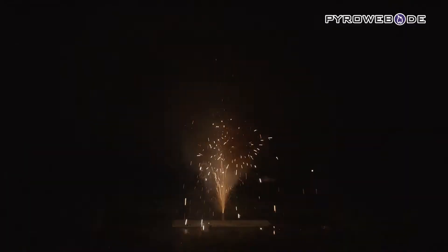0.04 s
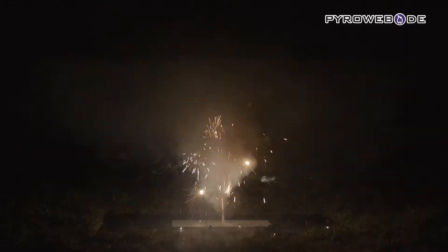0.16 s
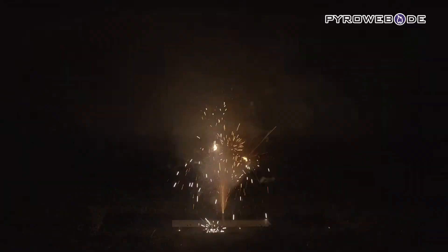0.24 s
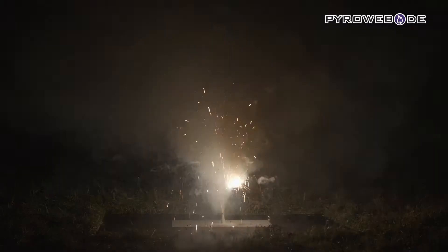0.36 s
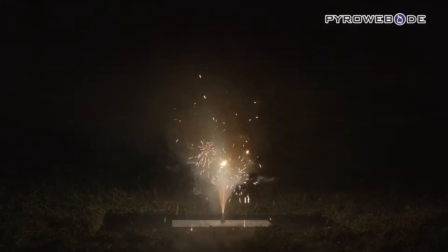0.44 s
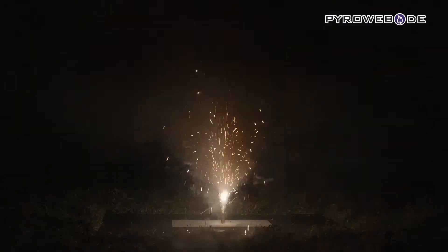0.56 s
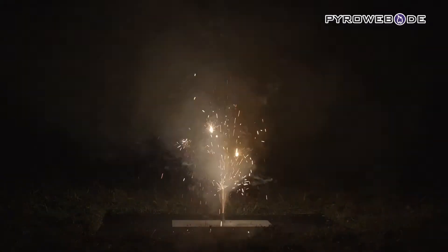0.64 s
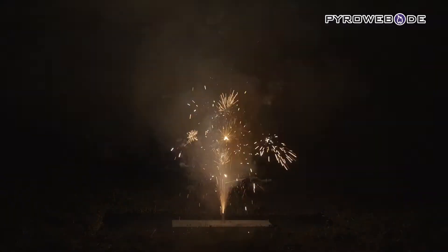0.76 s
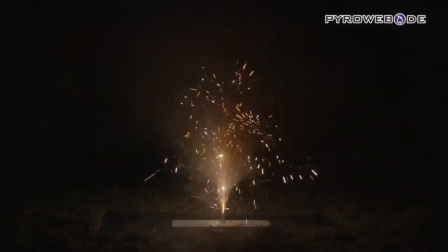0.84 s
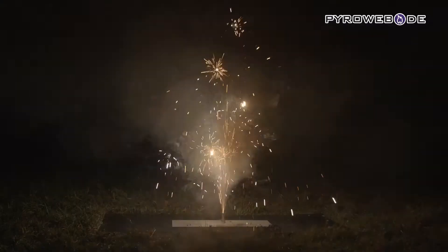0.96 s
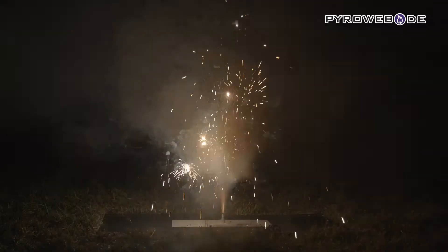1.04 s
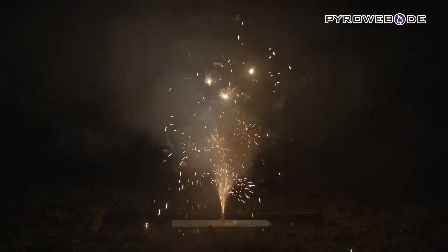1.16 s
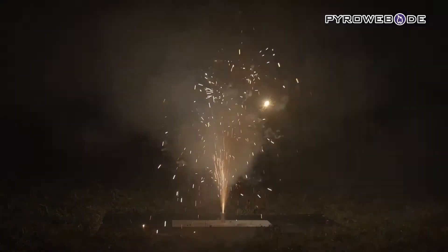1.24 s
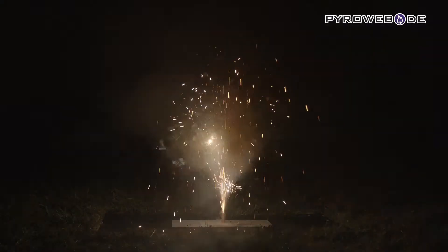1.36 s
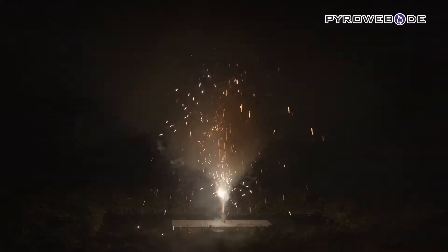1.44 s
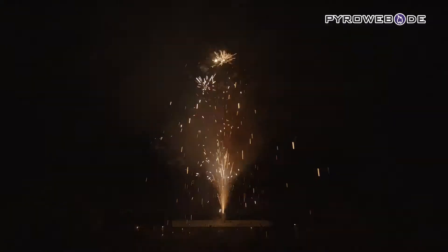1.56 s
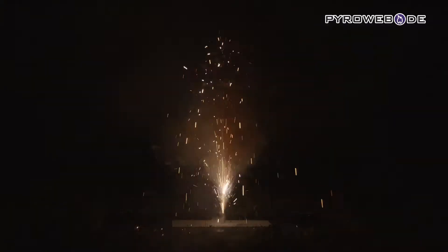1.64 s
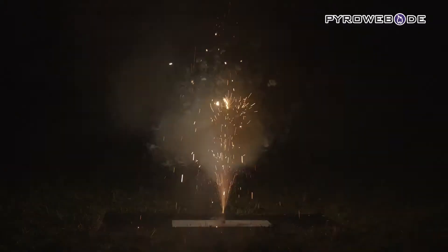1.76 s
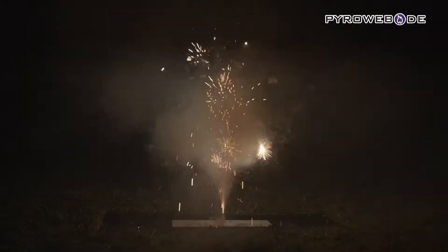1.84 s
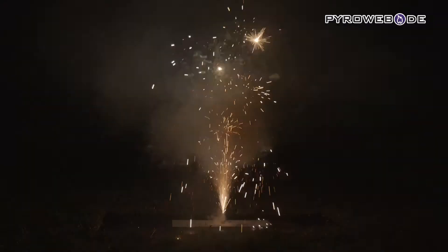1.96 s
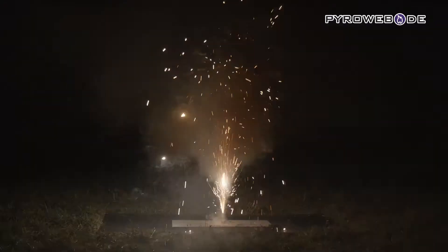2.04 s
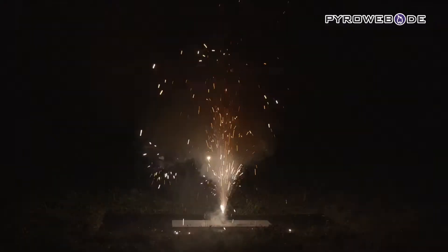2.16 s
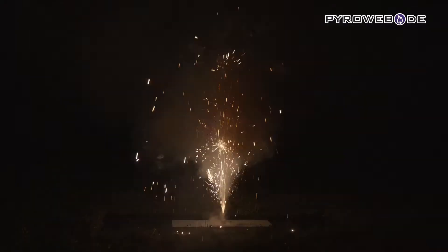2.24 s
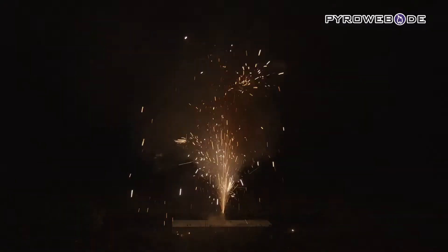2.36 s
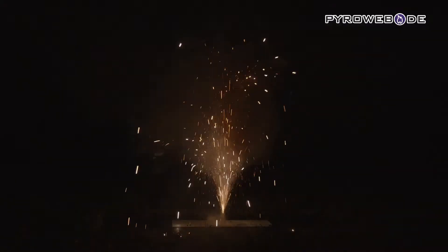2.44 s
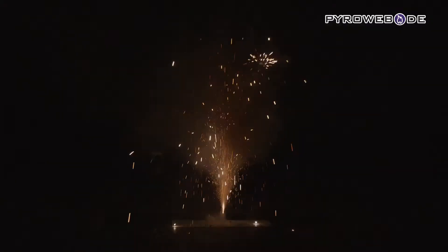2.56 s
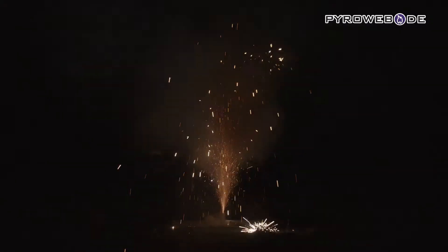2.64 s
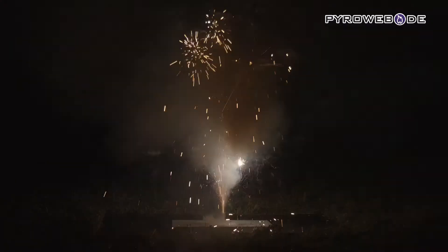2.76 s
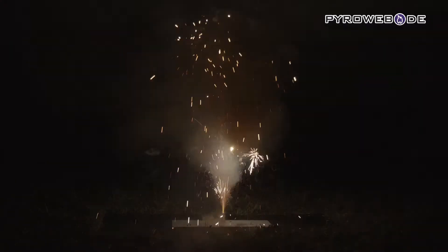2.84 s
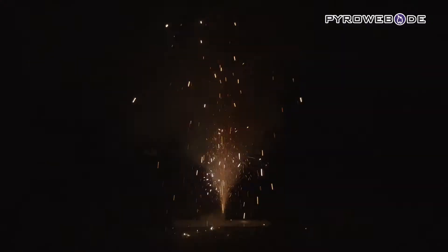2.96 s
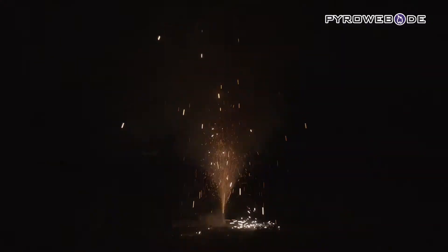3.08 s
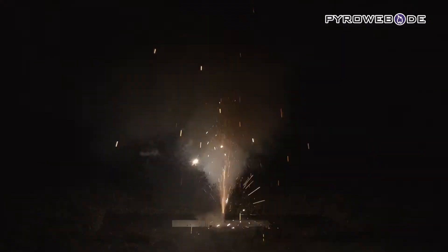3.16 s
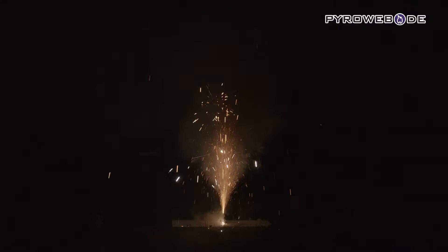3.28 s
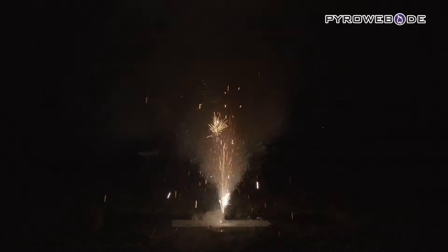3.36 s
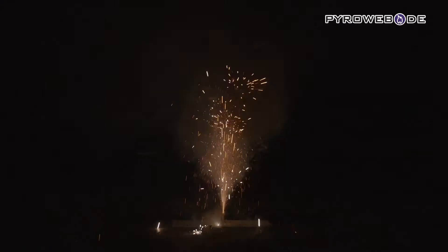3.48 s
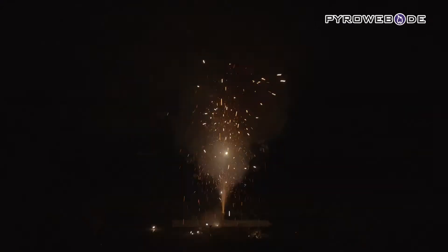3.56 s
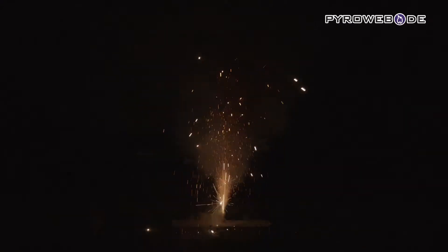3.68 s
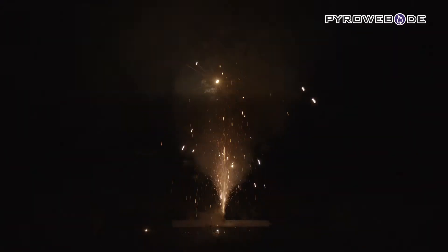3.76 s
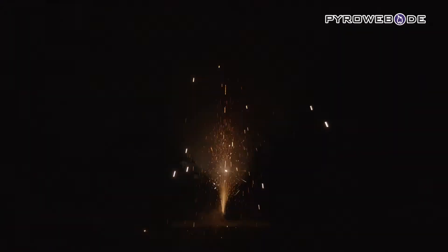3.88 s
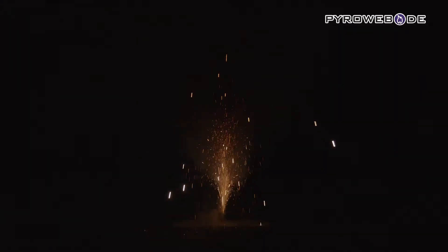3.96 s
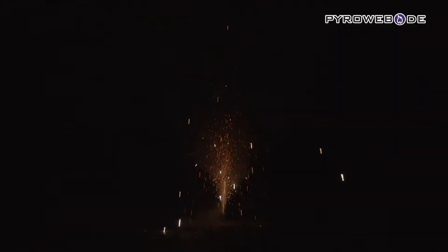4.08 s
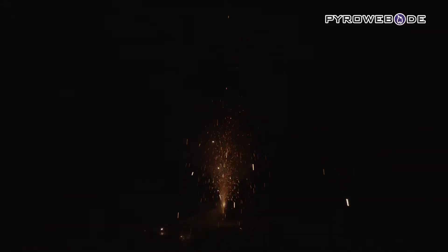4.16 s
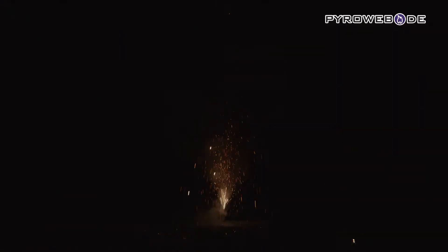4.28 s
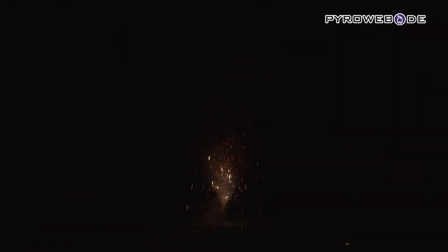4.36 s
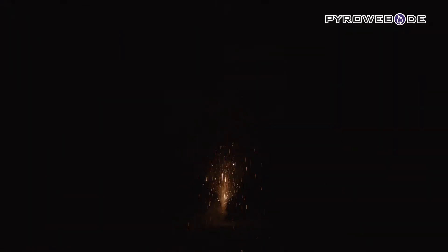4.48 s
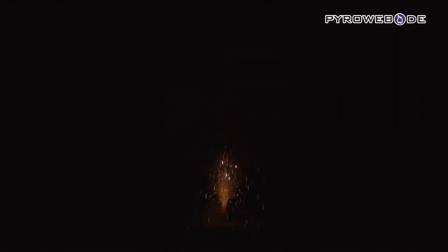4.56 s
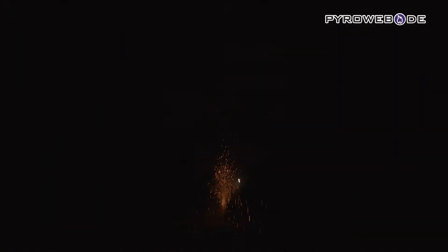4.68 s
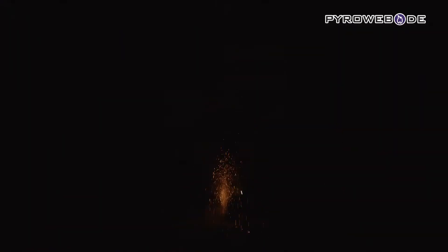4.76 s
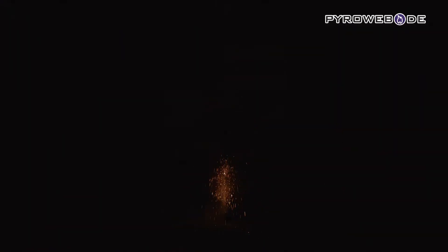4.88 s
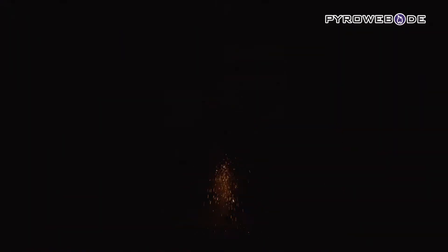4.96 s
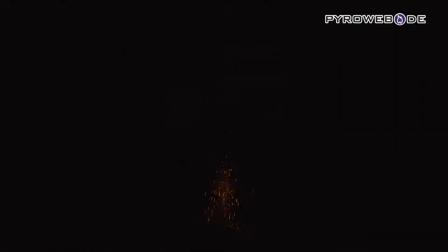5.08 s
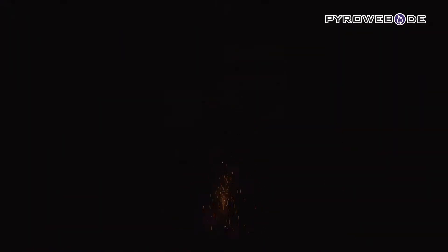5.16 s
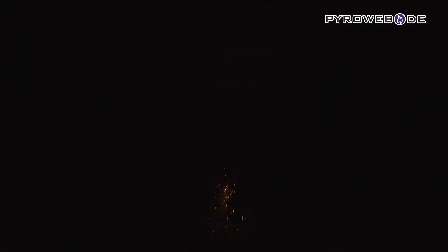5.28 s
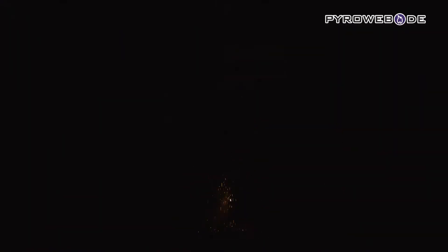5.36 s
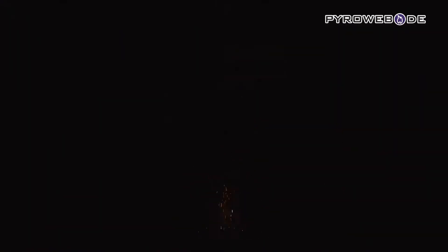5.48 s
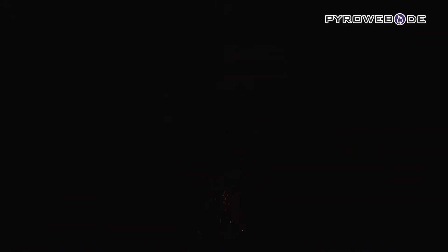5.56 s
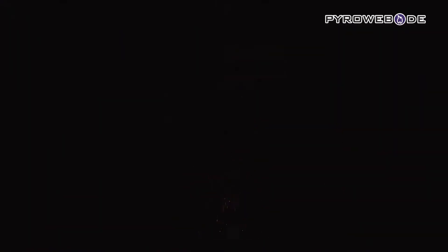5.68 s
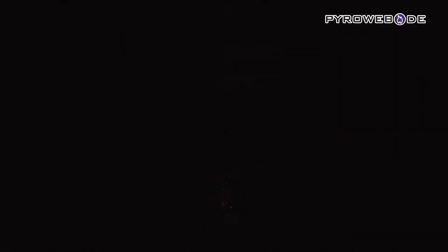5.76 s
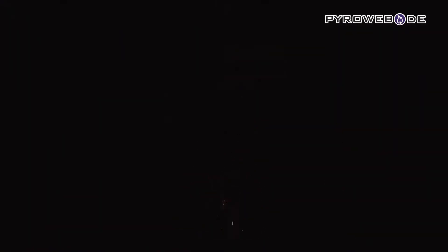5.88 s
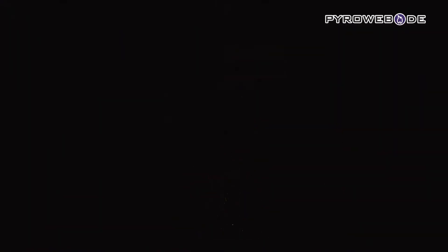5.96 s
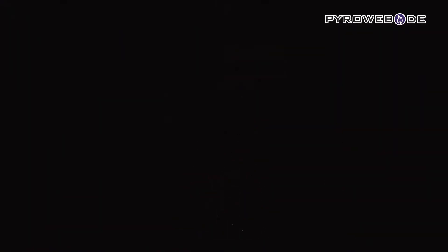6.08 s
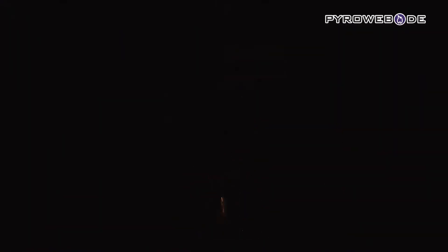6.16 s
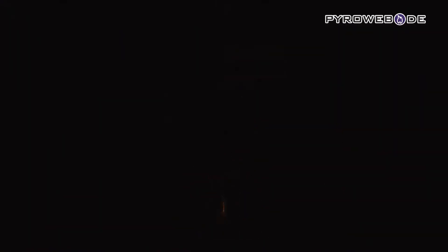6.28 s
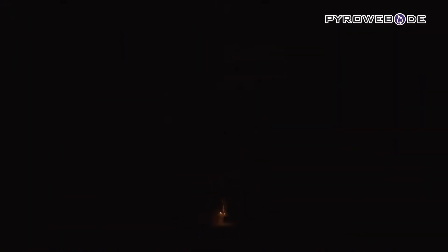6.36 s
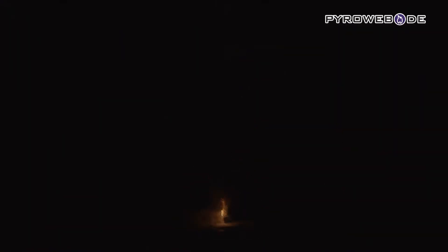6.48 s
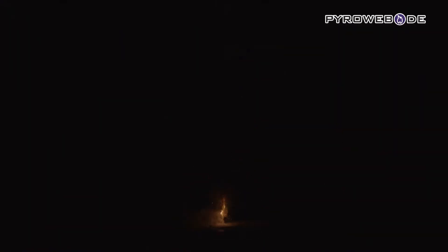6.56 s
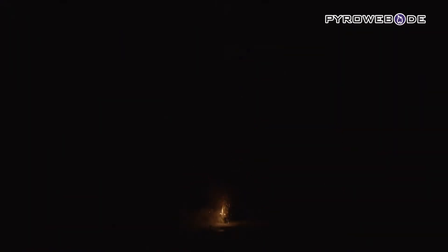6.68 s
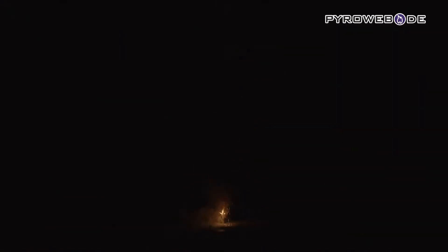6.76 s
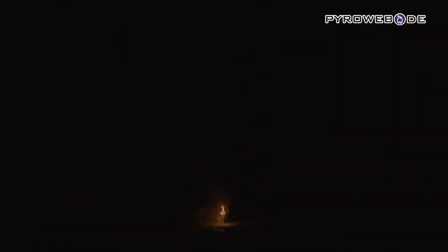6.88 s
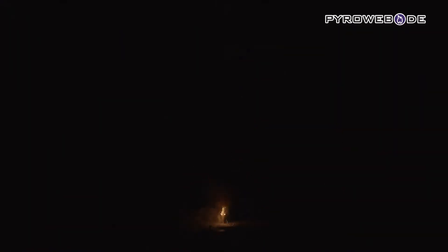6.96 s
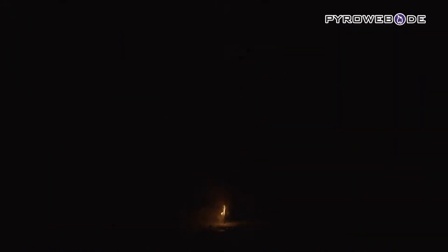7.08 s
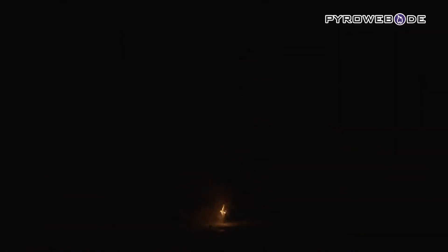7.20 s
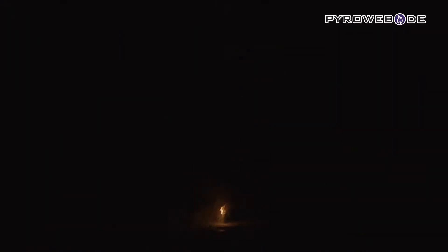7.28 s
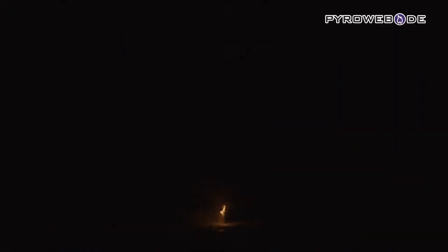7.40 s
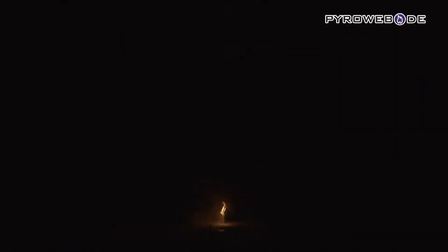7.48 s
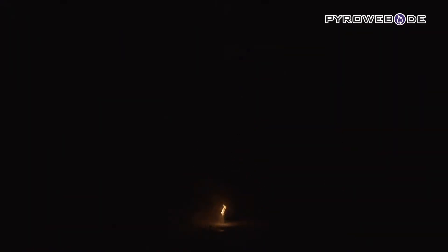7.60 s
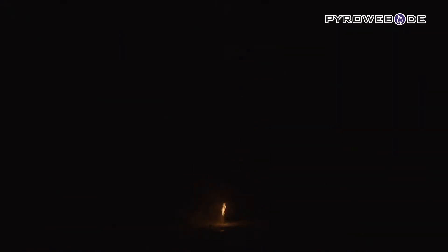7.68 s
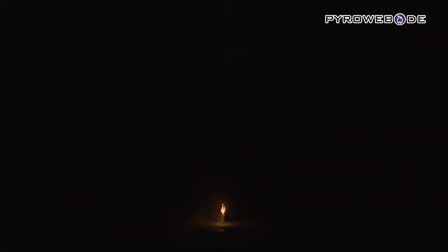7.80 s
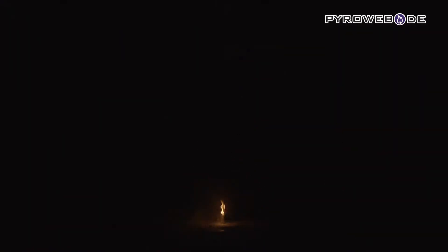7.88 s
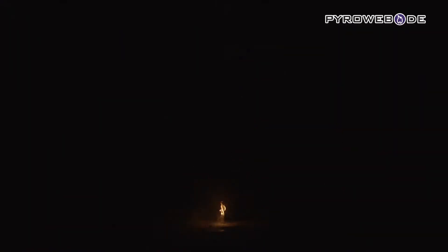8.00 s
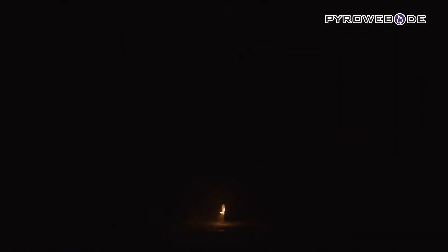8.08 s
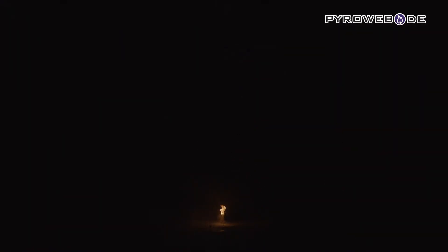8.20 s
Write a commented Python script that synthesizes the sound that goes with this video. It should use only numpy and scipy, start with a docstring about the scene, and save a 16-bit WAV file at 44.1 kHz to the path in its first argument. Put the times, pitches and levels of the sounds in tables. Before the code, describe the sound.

Outdoors at night, a ground fountain firework hisses and flutters softly while very sharp, loud crackling stars snap irregularly, roughly twenty a second with smaller sparks between. After four seconds the jet gasps and coughs out; a few isolated snaps follow, then almost silence with faint ember fizzes, one late pop and distant low rumble. Single microphone, open and dry.

```python
"""Fountain firework at night

Out in the open, crackling stars burst over a hissing jet until it burns out; ember fizzes follow.
Each burst is a tiny shock wave, with an echo off the ground, scatter in the grass and a far treeline's answer.
Shaped noise makes the jet and the gasps of the dying tube; its coughs are slow, blunt shocks.
Behind them lie a distant rumble and road wash, made of noise, and a faint, unsteady hum."""
import sys
import numpy as np
from scipy import signal
from scipy.fft import rfft, irfft, next_fast_len
from scipy.io import wavfile
from scipy.ndimage import uniform_filter1d, map_coordinates

SR = 44100
rng = np.random.default_rng(int(sys.argv[2]) if len(sys.argv) > 2 else 0)


def wav_out(sig):
    """Save sig, one row per channel (or a flat mono array), as 16-bit PCM at SR to the path in sys.argv[1]."""
    wavfile.write(sys.argv[1], SR, np.round(np.clip(np.atleast_2d(sig).T, -1, 1) * 32767).astype(np.int16))


def how_loud(loudness_db):
    """Turn decibels into a plain amplitude multiplier (0 dB gives 1, 20 dB gives 10)."""
    steps = np.asarray(loudness_db, float) / 20
    return 10 ** steps


N = 363364  # length in samples

# strength of the jet over time: time_s, hiss_db, roar_db (before a fixed trim),
# treble_db (treble of the hiss, relative to its usual share)
JET_STRENGTH = [(0, -56.5, -67.5, -1.5), (.35, -56.5, -61.5, -4.5), (.52, -49.5, -64, -6.5),
                (1.05, -55, -57.5, -6), (1.6, -49.5, -59, -5), (1.93, -56.5, -59, -0.5),
                (2.25, -52, -59, -3), (2.7, -62, -64.5, -1), (2.78, -54.5, -58.5, -4.5),
                (3.1, -57, -69.5, -3), (3.4, -53, -59, -1.5), (3.8, -56, -68, -4.5),
                (4.15, -63, -70.5, -10), (4.3, -75.5, -81.5, -10), (4.52, -82, -68, -1), (4.6, -90, -74, 1),
                (5.3, -105, -87, 11)]
# colour of the hissing gas: pitch_hz, level_db (relative, per Hz)
HISS_COLOUR = [(300, -24.5), (800, -4), (2200, -1.5), (3600, -6), (4800, -2.5), (7000, -3), (9000, -9.5),
               (15600, -18.5), (16300, -35.5)]
# duller colour of the gasps, also used for dulled scatter: pitch_hz, level_db (relative, per Hz)
GASP_COLOUR = [(180, -34.5), (300, -12), (937, -2.5), (1850, -7.5), (4300, -8.5), (7500, -29.5)]


def unit(x):
    """Scale to an rms (average strength) of 1."""
    return x / np.sqrt(np.mean(x ** 2) + 1e-20)


def curve(s, value):
    """Points in time joined by straight lines."""
    return np.interp(np.arange(N) / SR, s, value)


def wobble(rate):
    """A smooth random curve through `rate` random points a second."""
    points = rng.standard_normal(int(N * rate / SR) + 4)
    return map_coordinates(points, [np.arange(N) * rate / SR])


def filtered(x, response):
    """Change the strength and phase of each frequency in x by the given response."""
    size = x.shape[-1]
    padded = next_fast_len(size + 8192)  # silence at the end keeps the tail from wrapping round
    hz = np.fft.rfftfreq(padded, 1 / SR)
    return irfft(rfft(x, padded) * response(hz), padded)[..., :size]


def noise(spectrum, size=N):
    """Noise of rms 1 whose colour follows (Hz, dB) points."""
    points_hz, points_db = np.transpose(spectrum)

    def colour(hz):
        return how_loud(np.interp(np.log(hz + 1), np.log(points_hz), points_db, -120, -120))

    return unit(filtered(rng.standard_normal(size), colour))


def patchy(x, depth_db):
    """Random swells that each cover a part of the spectrum for a moment."""
    z = signal.stft(x, nperseg=512)[2]
    across_pitch = uniform_filter1d(rng.standard_normal(z.shape), size=16, axis=0)
    swells = uniform_filter1d(across_pitch, size=20, axis=1)  # smooth over time too
    return unit(signal.istft(z * how_loud(depth_db * unit(swells)), nperseg=512)[1][:N])


def shock(t, width, edge, rebound):
    """Pressure builds, drops within the edge time into suction, rebounds, then recovers slowly; times in ms."""
    drop = .5 + .5 * np.tanh((t - 0.24 * width) / edge)

    def lobe(at, wide):
        return np.exp(-((t - at) / wide) ** 2)

    pressure = (1 - drop) * lobe(0, 0.79 * width)
    suction = 0.36 * drop * lobe(.6 * width, 3.0 * width)
    return pressure - suction + rebound * lobe(3.0 * width, 0.61 * width) - 0.05 * lobe(0.4, 0.24)


def laid(times, rows, lead=0):
    """Sum short sounds into one track at their times, each starting `lead` samples early."""
    starts = np.round(np.asarray(times) * SR).astype(int)[:, None]
    at = starts + np.arange(rows.shape[1]) - lead
    # whatever falls outside the track goes to its first sample or to a spare one at the end
    return np.bincount(np.clip(at, 0, N).ravel(), rows.ravel(), N + 1)[:N]


def night():
    """Distant rumble and road wash as coloured noise, with a hum whose pitch and level waver."""
    # colour of the rumble and wash: pitch_hz, level_db (relative, per Hz)
    night_colour = [(25, -17.5), (50, -3.5), (70, 3.5), (135, -25.5), (280, -29), (420, -20), (820, -16),
                    (1230, -23.5), (2900, -37.5), (4400, -50.5), (16000, -59.5)]
    # central level of the hum: time_s, level_db
    hum_level = [(5.35, -95), (5.5, -84.5), (6.6, -77.5), (8.24, -79)]
    hum_hz = 363 + 6 * wobble(30)
    hum_gain = how_loud(curve(*np.transpose(hum_level)) + 3 * wobble(9))
    hum = hum_gain * np.sin(2 * np.pi * np.cumsum(hum_hz) / SR)
    return how_loud(-66.5 + 0.42 * wobble(2.8)) * noise(night_colour) + hum


def treeline(x):
    """Far trees return a thin, diffuse answer that starts about a tenth of a second late."""
    # colour of the answer: pitch_hz, level_db (relative)
    trees_colour = [(600, -11.5), (2700, -5.5), (4600, 0), (6200, -1), (9000, -8.5), (15000, -19)]
    t = np.arange(SR // 2) / SR - .11
    rise = (t > 0) * (1 - np.exp(-np.abs(t) / 0.012))
    swell = rise * how_loud(-60 * t / .55)  # fades at a rate of 60 dB in 0.55 s
    return signal.fftconvolve(x, swell * noise(trees_colour, size=len(t)))[:N]


def fizzes():
    """Embers fizz in the grass: soft swells of hiss, each around its own pitch."""
    # the fizzing embers: start_s, length_s, level_db, pitch_hz (middle of the hiss)
    ember_fizzes = [(5.271, 0.0096, -72, 10760), (5.671, .006, -78, 5500), (5.768, .01, -78.5, 6000),
                    (5.822, .17, -89, 6160), (7.033, 0.01, -79, 6200)]
    t = np.arange(N) / SR
    total = np.zeros(N)
    for s, length, db, hz in ember_fizzes:
        swell = np.sin(np.pi * np.clip((t - s) / length, 0, 1))
        total += how_loud(db) * swell * noise([(.5 * hz, -25), (hz, 0), (2 * hz, -14)])
    return total


def sputters():
    """Rough gasps of the dying jet: each rises fast, holds and fades, with a coarse flutter."""
    # the gasps: start_s, length_s (before the fade), level_db (before the flutter)
    gasps = [(4.117, 0.018, -65), (4.335, 0.029, -68), (4.497, 0.043, -64.5)]
    t = np.arange(N) / SR
    gate = np.zeros(N)
    for s, length, db in gasps:
        gate += how_loud(db) * np.interp(t - s, [0, .014, length, length + 0.023], [0, 1, 1, 0])
    return gate * how_loud(4.1 * wobble(300)) * noise(GASP_COLOUR)


def coughs():
    """Gas puffs from the tube, a random flutter of them at first: slow blunt shocks with a brief spit of hiss."""
    # separate coughs: time_s, level_db (before a shared lift)
    tube_coughs = [(4.243, -63), (4.354, -67.5), (4.475, -69), (4.824, -62.5), (5.087, -63.5), (5.115, -66),
                   (5.678, -71.5), (5.774, -69), (6.207, -66.5), (6.592, -69)]
    jet_s, _, roar_db, _ = np.transpose(JET_STRENGTH)
    draw = rng.random((140, 3))
    flutter_s = draw[:, 0] * 4.5
    flutter_db = np.interp(flutter_s, jet_s, roar_db) - 1.0 - 1.3 * np.log(draw[:, 1] + 0.2)
    s, db = np.concatenate([np.transpose(tube_coughs), [flutter_s, flutter_db]], axis=1)
    width_ms = np.concatenate([np.full(len(tube_coughs), .75), 0.23 + 1.4 * draw[:, 2]])[:, None]
    t = np.arange(900) / SR * 1000  # ms
    spit = how_loud(-28 - 60 * np.abs(t - 3.5) / 25) * noise(HISS_COLOUR, size=(len(s), len(t)))
    puff = shock(t - 3.5, width_ms, edge=0.17, rebound=0)
    return laid(s, how_loud(db + 16.5)[:, None] * (puff + spit))


def jet():
    """Burning gas: a surging hiss of changing brightness and a fluttering low roar."""
    # colour of the flame roar: pitch_hz, level_db (relative, per Hz)
    roar_colour = [(70, -5.5), (200, 3), (600, -6.5), (2500, -11.5), (5000, -32)]
    s, hiss_db, roar_db, treble_db = np.transpose(JET_STRENGTH)
    fade_db = curve([s[-1], s[-1] + 0.3], [0, -30])
    body = patchy(noise(HISS_COLOUR), depth_db=2.0)
    treble = filtered(body, lambda hz: 1 / (1 + (3500 / (hz + 1)) ** 6))  # the part above about 3500 Hz
    treble_gain = how_loud(curve(s, treble_db) + 2.5 * wobble(8.1))
    hiss_gain = how_loud(curve(s, hiss_db) + fade_db + 2.2 * wobble(35))
    hiss = hiss_gain * (body - treble + treble_gain * treble)
    roar_gain = how_loud(curve(s, roar_db) + fade_db - 1.5 + 5.5 * wobble(40))
    return hiss + roar_gain * noise(roar_colour)


def pops(s, db, width, delay, echo_db, scatter_db):
    """Shock, ground echo (usually duller), and scatter that swells for a millisecond and dies fast."""
    # colour of the scatter from near grass: pitch_hz, level_db (relative)
    grass_colour = [(150, -2), (700, -9.5), (4500, -0.5), (9000, -1), (15600, -11.5), (16300, -25)]
    t = (np.arange(3500) - 40) / SR * 1000  # ms
    shape = (len(s), len(t))
    late = ((s * SR - np.round(s * SR)) / SR * 1000)[:, None]  # part of a sample left over, in ms
    width, delay = np.clip(width, .03, 1)[:, None], delay[:, None]  # ms
    # a star that bursts on the ground echoes within 0.3 ms, strong, with a blunter front
    grazing = delay < .3
    rebound = 0.47 * rng.random((len(s), 1))
    echo_width = np.where(grazing, 1, 1.3) * width
    echo = shock(t - late - delay, echo_width, edge=np.where(grazing, 0.0252, 0.042), rebound=rebound)
    direct = shock(t - late, width, edge=np.where(grazing, 0.0252, 0.014), rebound=rebound)
    direct = direct + how_loud(np.where(grazing, -2, echo_db[:, None])) * echo

    # share of the scatter that comes back dulled, most of it along the ground
    dull = np.where(grazing, .75, rng.random((len(s), 1)) ** 2)
    bright_part = np.sqrt(1 - dull) * noise(grass_colour, size=shape)
    dull_part = np.sqrt(dull) * noise(GASP_COLOUR, size=shape)
    after = np.maximum(t, 0)
    quick = how_loud(-60 * after / 45) * (bright_part + dull_part)
    slow = how_loud(-14.5 - 60 * after / 105) * noise(HISS_COLOUR, size=shape)  # farther ground returns duller
    swell = 1 - np.exp(-after / 1.2)
    scatter = how_loud(scatter_db + 4.5)[:, None] * swell * (quick + slow)
    return laid(s, how_loud(db)[:, None] * (direct + scatter), lead=40)


def sparks(s, db):
    """Small shocks of random width, echo delay (as from random heights), echo strength and scatter."""
    draw = rng.random((len(s), 4))
    width_ms, delay_ms = 0.014 + 0.12 * draw[:, 0], 0.47 + 1.1 * draw[:, 1]
    return pops(s, db, width_ms, delay_ms, echo_db=-5 - 10 * draw[:, 2], scatter_db=-27 - 8 * draw[:, 3])


def crackle():
    """Shocks from loud stars and single sparks, and a faint random patter that follows the jet's strength."""
    # crackling stars: time_s, peak_db (of the shock alone), width_ms (of the shock),
    # delay_ms (of the ground echo), scatter_db (grass, relative to the peak, before a shared lift)
    stars = [(0.0146, -10, 0.053, 0.95, -33), (.022, -2, 0.032, 0.87, -44),
             (0.045, -11, 0.036, 0.97, -41.5), (0.0687, -5, 0.045, 0.9, -29),
             (0.1415, -11.5, 0.033, 0.87, -36.5), (0.1617, -5.5, 0.035, 0.87, -38),
             (0.2546, -8.5, 0.038, 1, -39), (0.2642, 1.5, 0.059, 0.65, -31.5),
             (0.277, -5, 0.044, 0.42, -38.5), (0.3302, -6, 0.16, 1.055, -27),
             (.4104, -7, 0.046, 1.1, -33.5), (0.4707, -6, 0.036, 1.35, -36),
             (0.5516, -0.5, 0.07, 1.43, -31), (0.6251, -2, 0.033, 1, -39), (0.7161, -4, 0.032, 0.97, -38),
             (0.7377, -5.5, 0.047, 1.2, -35), (0.7797, -11, 0.054, 1, -28.5),
             (.801, -4, 0.042, 1.23, -35.5), (0.8687, -10, 0.052, 0.87, -29),
             (0.8845, -2, 0.051, 1.33, -34.5), (0.9265, -4.5, 0.053, 1.1, -33),
             (0.9355, -12, 0.042, 0.16, -27.5), (0.9764, -5.5, 0.088, 1.34, -28.5),
             (0.9989, -8.5, 0.064, 1.18, -29), (1.178, -16, 0.093, 1, -20.5),
             (1.3508, -13, 0.065, 1.3, -32), (1.3587, -1.5, 0.041, 1.86, -31),
             (1.3845, -6.5, 0.088, 1.43, -29.5), (1.4435, -3.5, 0.039, 0.94, -29.5),
             (1.4741, -6, 0.045, 0.63, -36.5), (1.4834, -11, 0.078, 0.7, -41),
             (1.571, -6.5, 0.072, 1.76, -34), (1.6197, -3.5, 0.038, 1.16, -31.5),
             (1.6517, -1.5, 0.066, 1.9, -34.5), (1.6759, -11.5, 0.077, 1.14, -26),
             (1.7234, -4.5, 0.072, 1.86, -37), (1.7569, -16.5, 0.098, 1.24, -18),
             (1.788, -6.5, 0.091, 2.3, -30), (1.7996, -12.5, 0.07, 1.4, -23.5),
             (1.842, 1, 0.056, 1.82, -32.5), (1.8853, -11, 0.054, .59, -44.5),
             (1.987, -11.5, 0.067, 1.14, -24), (2.0987, -7, 0.047, .58, -34.5),
             (2.14, -1, 0.069, 1.41, -30.5), (2.2196, -7.5, 0.054, 1.26, -29.5),
             (2.3514, -5, 0.046, 1.56, -34), (2.3816, 5, 0.061, 2.6, -33), (2.416, -12, 0.037, 0.63, -29.5),
             (2.4438, -11, 0.072, 0.92, -35.5), (2.4528, -9, .042, 0.7, -30.5),
             (2.6064, -4.5, 0.04, 0.65, -43.5), (2.6421, -17.5, .035, 0.17, -33),
             (2.8406, -17.5, 0.1, 1.9, -18), (2.888, -0.5, 0.048, 0.82, -37.5),
             (2.919, -11.5, 0.13, 0.97, -23), (3.0874, -8, 0.048, 0.66, -35.5),
             (3.1647, -6.5, 0.067, 0.73, -32.5), (3.2393, -12.5, 0.053, 2, -41.5),
             (3.2468, -2, 0.047, 0.47, -40.5), (3.274, -6.5, 0.13, 1.7, -20.5),
             (3.288, -12, 0.056, 2.5, -25.5), (3.3667, -12.5, 0.075, 0.97, -28),
             (3.395, -0.5, 0.062, 1.77, -32), (3.5023, -0.5, 0.07, 0.87, -32),
             (3.515, -10, 0.054, 1.3, -35), (3.5522, -8, 0.095, 1.66, -27.5),
             (3.6204, -13, 0.088, 1.1, -29.5), (3.6305, -0.5, 0.093, 1.23, -26),
             (3.8455, -3, 0.073, 1.88, -29.5), (3.872, -10.5, 0.053, 0.91, -27.5),
             (3.8919, -2.5, 0.064, 1.7, -33), (3.9417, -6, 0.066, 0.94, -30.5),
             (3.96, -15, 0.075, 1.6, -41), (4.2072, -19.5, 0.063, 0.78, -28.5),
             (4.5292, -28, 0.055, 0.09, -37), (4.5807, -20, 0.055, 0.078, -38),
             (4.7367, -33.5, 0.06, 0.074, -53), (4.7616, -11.5, 0.053, 0.074, -38),
             (6.4777, -14.5, 0.093, 0.12, -35)]
    # single spitting sparks: time_s, peak_db (of the shock alone)
    single_sparks = [(0.0585, -20), (.096, -25.5), (.243, -31), (0.2906, -11.5), (0.2954, -20), (0.49, -21),
                     (0.541, -22), (0.5854, -25.5), (0.6054, -13.5), (0.6423, -17.5), (0.6583, -25),
                     (0.6718, -17.5), (.848, -24), (0.9133, -28), (0.9394, -12.5), (1.021, -16),
                     (1.055, -33), (1.0766, -18.5), (1.087, -18.5), (1.1349, -17.5), (1.2087, -23),
                     (1.2225, -16), (1.3967, -14.5), (1.449, -21), (1.528, -18), (1.5906, -19.5),
                     (1.6875, -16.5), (1.9635, -25), (2.0134, -23.5), (2.047, -30), (2.213, -17.5),
                     (2.3463, -21), (2.405, -20.5), (2.4389, -19.5), (2.479, -22.5), (2.5465, -9),
                     (2.5734, -31), (2.5894, -13.5), (2.693, -38), (2.8342, -25), (2.8793, -15.5),
                     (2.9685, -15.5), (3.0457, -29.5), (3.144, -20.5), (3.2574, -12), (3.375, -15),
                     (3.47, -33), (3.6572, -15.5), (3.684, -27), (3.7189, -20.5), (3.7815, -20.5),
                     (3.8, -26), (3.974, -24.5), (4.0536, -33.5), (4.0803, -37), (4.356, -51.5),
                     (4.483, -54), (4.6325, -53), (4.9773, -52.5), (5.0712, -49.5), (5.3122, -55),
                     (5.7197, -59), (6.0109, -45.5), (6.444, -62.5)]
    jet_s, hiss_db, _, _ = np.transpose(JET_STRENGTH)
    draw = rng.random((130, 2))
    patter_s = draw[:, 0] * 5.45
    jet_db = np.maximum(np.interp(patter_s, jet_s, hiss_db), -80)
    patter = sparks(patter_s, jet_db + 15 - 2.0 * np.log(draw[:, 1] + .03))
    s, db, width, delay, scatter_db = np.transpose(stars)
    # a star that lights the grass more also echoes more; -31.5 dB is the usual scatter
    echo_db = -9.5 + .8 * (scatter_db + 31.5)
    bursts = pops(s, db, width, delay, echo_db, scatter_db)
    return bursts + sparks(*np.transpose(single_sparks)) + patter


def scene():
    """Everything summed at one microphone."""
    bursts = crackle()
    answer = how_loud(-65.5) * treeline(bursts)
    return (bursts + answer + jet() + coughs() + sputters() + fizzes() + night())[None]


def low_pass(x):
    """Removes everything above the highest recorded frequency."""
    return signal.sosfilt(signal.butter(12, 17140, fs=SR, output="sos"), x)


def record(dry):
    """The microphone housing rings briefly, the band ends are cut and the loudest shocks are rounded off."""
    # microphone resonances: pitch_hz, width_hz, level_db (of the added ring)
    housing = [(4900, 1500, -10.5), (11600, 4800, -4)]

    def microphone(f):
        ring = 1
        for c, w, db in housing:
            ring = ring + how_loud(db) * 1j * f * w / (c * c - f * f + 1j * f * w)
        return ring * (1j * f / (38 + 1j * f)) ** 2  # lows fall away below about 38 Hz

    x = filtered(dry, microphone)
    x = x / (1 + np.abs(x / .53) ** 6) ** (1 / 6)  # peaks level off at 0.53
    x = filtered(x, lambda f: 1 / (1 + (f / 16600) ** 70))
    return low_pass(x)


dry = scene()
out = record(dry)
wav_out(out)
```